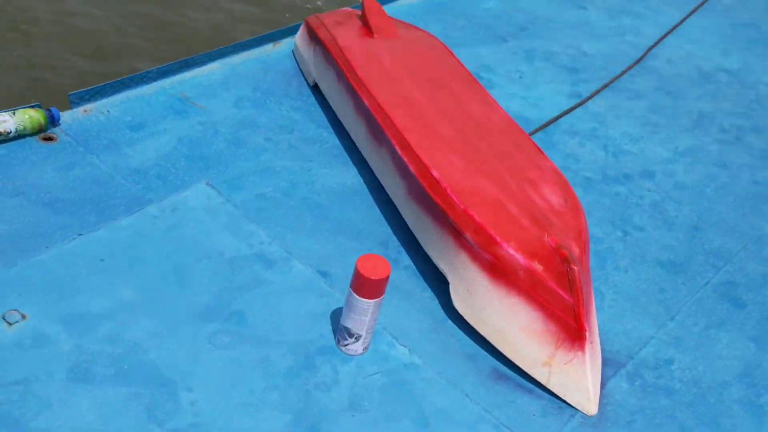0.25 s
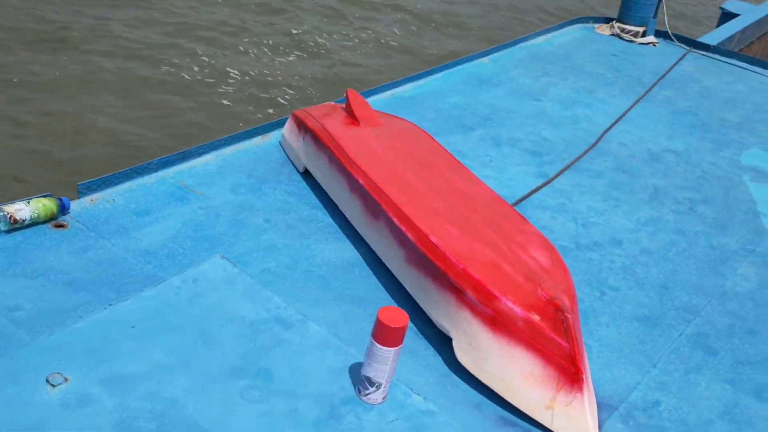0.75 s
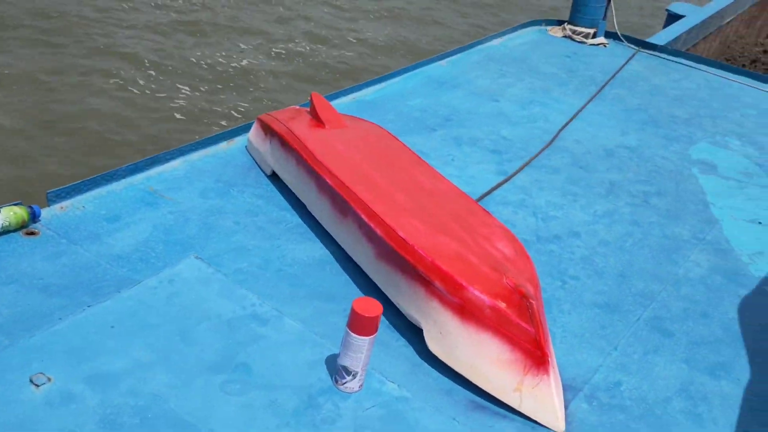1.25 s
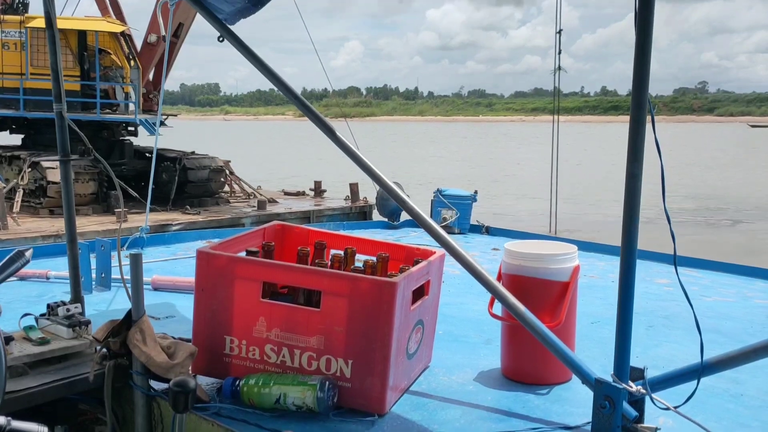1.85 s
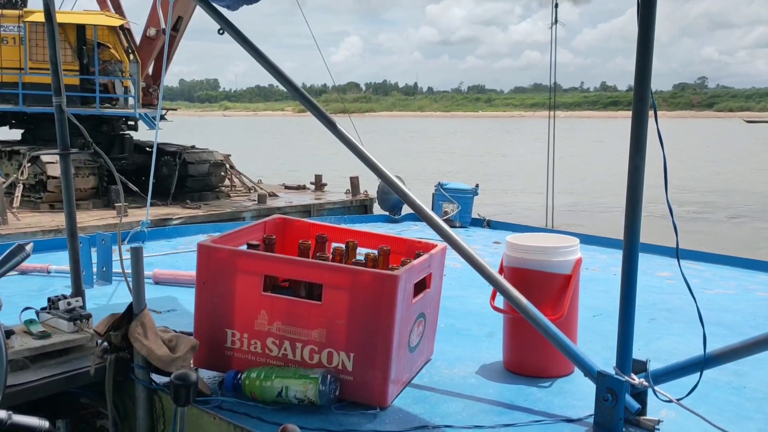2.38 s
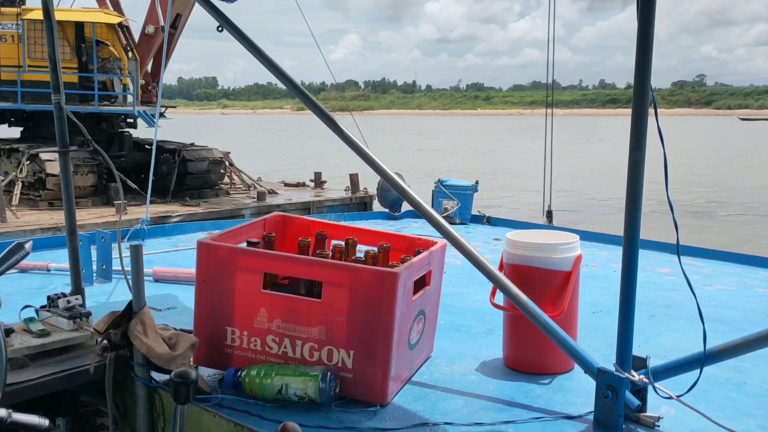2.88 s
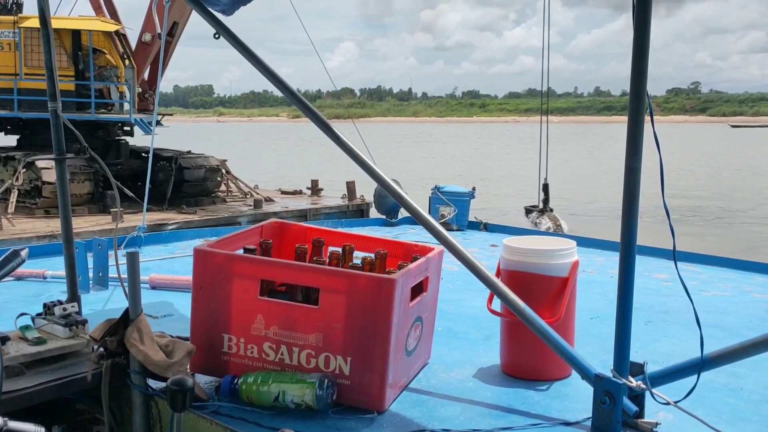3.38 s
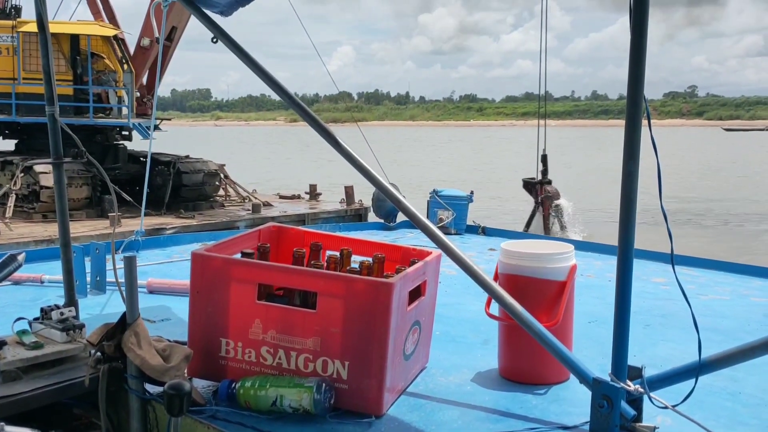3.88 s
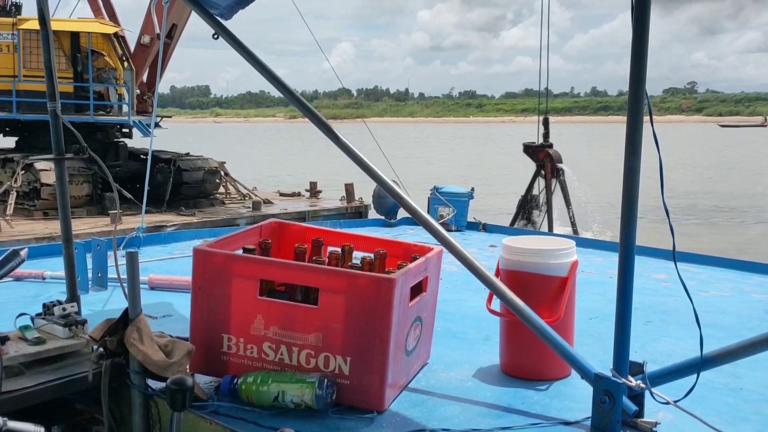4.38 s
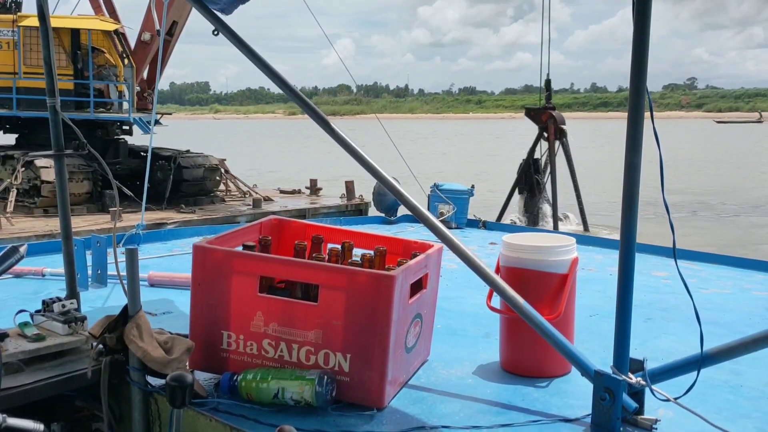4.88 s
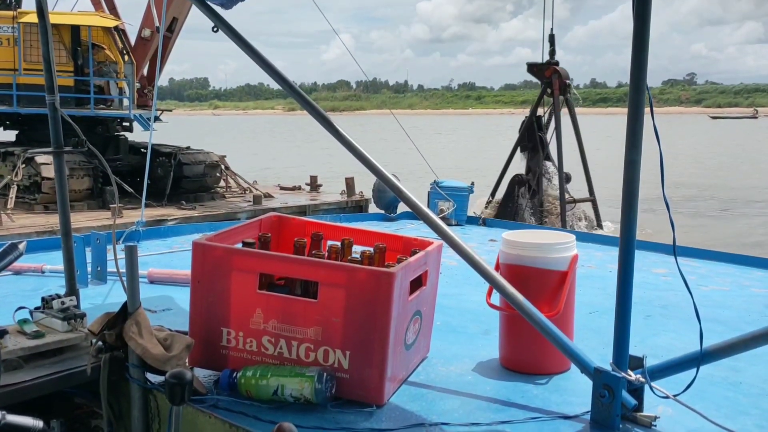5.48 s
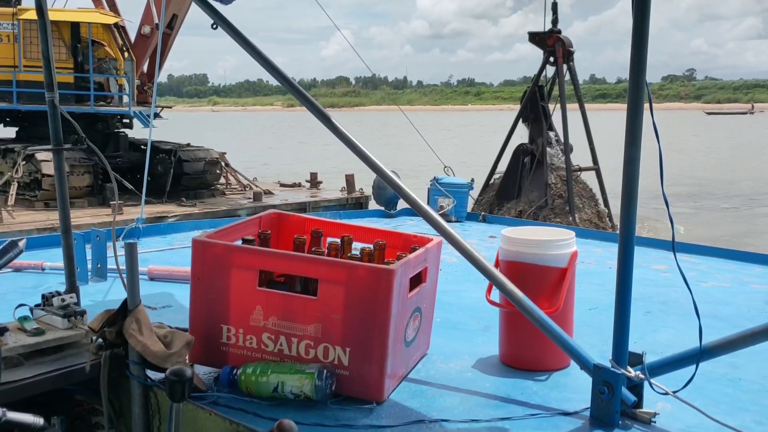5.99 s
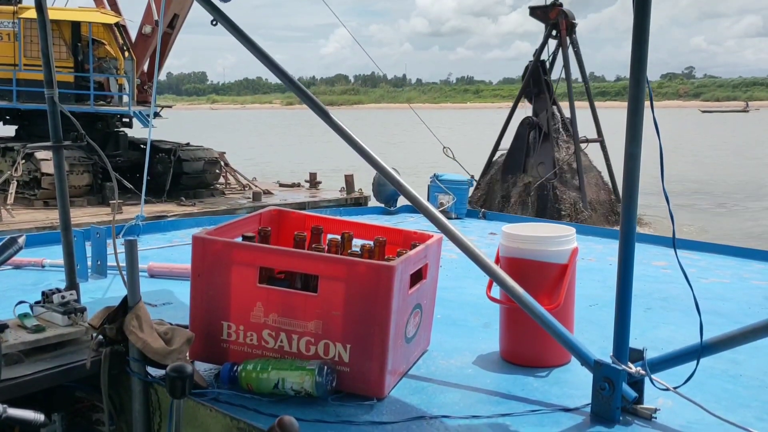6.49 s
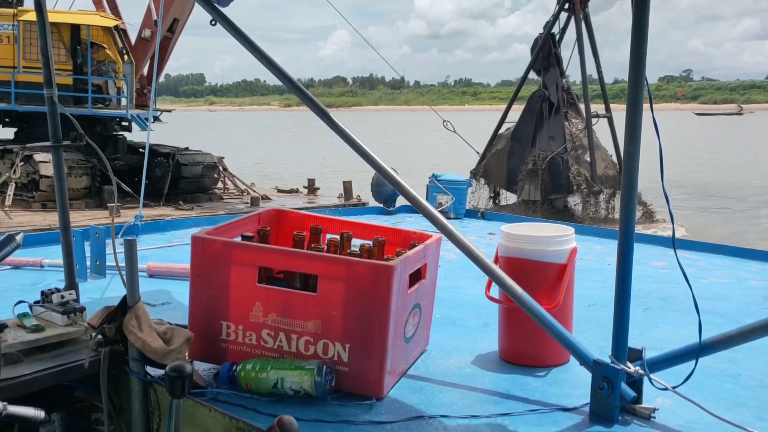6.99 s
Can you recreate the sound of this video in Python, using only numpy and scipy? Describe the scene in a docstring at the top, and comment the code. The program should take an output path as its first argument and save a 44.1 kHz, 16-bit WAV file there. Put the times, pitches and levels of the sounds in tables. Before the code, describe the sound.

From 0 to 1.3 seconds, an open boat deck: low lumpy wind on the microphone, water washing along the hull and dying down, and a soft low engine throb. A bright hissing spray peaks near 0.45 seconds and fades quickly. From 1.2 a low rough moan slides upward, then everything is cut. Silence lasts until about 1.5, when a crane hoisting its grab fades in within a tenth of a second, much louder: coarse diesel roar, rushing air and hiss, a winch gear hum with higher whining multiples, and a faint turbocharger whistle. The gear pitch climbs until 2.3 and holds. At 2.8 the rushing treble dips suddenly, recovering darker; loudness drops by 3.4 and keeps easing. Between 5.7 and 6.35 short high rope squeaks chirp from the left. The winch pitch sags after 6.1, the whistle rises slightly, and the drone continues to the end around 7.2, with low wind gusts beneath.

```python
"""A boat deck in the wind, with water washing by, a burst of spray and an idling engine; the sound is cut.
After a short silence a barge crane hoisting its grab fades in: diesel roar, rushing air, winch gear tones,
engine hum, turbocharger whistle and rope squeaks. Wind, water and engine roar are noise shaped in pitch,
loudness and left-right place; the engine orders, gear, turbocharger and rope are sines, most made rough."""
import sys
import numpy as np
from scipy import signal
from scipy.io import wavfile
from scipy.ndimage import uniform_filter1d

SR = 44100
rng = np.random.default_rng(int(sys.argv[2]) if len(sys.argv) > 2 else 0)


def attenuation_scalar(level_db):
    """Turn a level in dB into a linear amplitude multiplier (20 dB per decade)."""
    decades = np.asarray(level_db, float) / 20
    return 10 ** decades


def int16_out(signal):
    """Quantize to a 16-bit WAV file."""
    q = np.round(np.clip(np.atleast_2d(signal).T, -1, 1) * 32767)
    wavfile.write(sys.argv[1], SR, q.astype(np.int16))


N = 319725
T = np.arange(N) / SR  # time in seconds

# Spectra, of which only the shape counts. Each row: frequency in Hz, relative power per Hz in dB.
WIND_SPECTRUM = [(12, -35), (25, -14), (42, -2), (70, 0), (110, -4), (200, -7), (320, -10), (520, -35),
                 (880, -90)]
WASH_SPECTRUM = [(120, -31), (200, -15), (325, -19), (403, -10.5), (739, -9.5), (823, -11.5), (1020, -11.5),
                 (1370, -18), (1590, -18.5), (5000, -35.5), (6500, -66), (11000, -120)]
SPRAY_SPECTRUM = [(1180, -42), (2000, -12), (2280, -20), (2800, -10.5), (3590, -7.5), (4080, -6.5),
                  (5860, -9.5), (12100, -18), (14900, -12.5), (15600, -43)]
# Spectra of the crane's engine, in the same form. Each row: frequency in Hz, relative power per Hz in dB.
ROAR_SPECTRUM = [(59, -41), (100, -17), (149, -22), (193, -15), (278, -9.5), (329, -4.5), (484, -7),
                 (559, -8.5), (627, -17), (714, -26.5), (823, -10), (913, -8), (1110, 0), (1490, -18.5),
                 (2200, -20.5), (2860, -25.5), (4840, -120)]  # also colours the upper gear tones
LOW_RUSH_SPECTRUM = [(1000, -32), (1700, -5), (2150, -6.5), (2470, -0.5), (2630, -7.5), (2880, -2),
                     (3210, -5.5), (3640, -0.5), (3830, -3), (4100, -12), (4300, -10.5), (5590, -9),
                     (9460, -120)]
HISS_SPECTRUM = [(6000, -17), (7600, -2.5), (8800, -7), (10200, -5.5), (11100, -5.5), (12400, -12.5),
                 (13200, 2), (15700, -6)]
INTAKE_SPECTRUM = [(12500, -35), (13000, -21), (13700, 8), (14800, -2), (15300, -14), (15700, -30)]
# Two spectra of the high rush, before and after it drops and darkens.
# Each row: frequency in Hz, relative power per Hz in dB.
HIGH_RUSH_SPECTRA = [(2470, -43), (4200, -20), (4410, -11), (4960, 2), (5590, -4), (6500, -4.5),
                     (7090, 5.5), (7460, -5), (8000, -20), (10400, -41), (17600, -120)], [(2470, -40),
                     (4200, -13), (4820, 1.5), (5500, -9), (6230, -2.5), (6480, -9), (6650, 1.5),
                     (6940, 4.5), (7900, -28.5), (10300, -40), (17400, -120)]

# How sound reaches the two microphone ports, on deck and by the crane. Each row: frequency in Hz,
# likeness of the ports from 0 to 1, left minus right level in dB, lead of the left port in radians.
DECK_EARS = [(50, .995, 0, 0), (300, .88, -.8, -.5), (520, .5, -3, -.8), (700, .82, -4.3, -1.4),
             (1000, .42, -4, -3.5), (1600, .35, -4, -4.6), (2500, .15, -2, -5), (4000, .4, -2.5, -6.5),
             (5500, .4, -6, -9.5), (7000, .45, -.5, -12.6), (10000, .3, 0, -12.6), (13000, .95, 0, -12.6)]
CRANE_EARS = [(50, .995, .1, 0), (100, .97, .1, .03), (200, .8, .8, .17), (300, .93, 1.5, .24),
              (560, .92, 1, .3), (700, .2, 1, 1.5), (830, .6, 6, .7), (950, .6, 4, .9),
              (1150, .9, 5.5, 1.67), (1450, .43, .5, 2.1), (1620, .55, 2.8, 2.4), (1850, .55, .2, -.2),
              (2500, .85, 4.2, .2), (3000, .77, 3.8, .16), (3300, .6, 1.5, -.9), (3700, .85, 5.5, -.4),
              (4200, .45, 7.3, -.7), (4800, .92, 6.3, 0), (7600, .9, 6.3, 0), (8400, .55, 1.3, 1),
              (9200, .4, 1.2, 5), (11000, .62, 1, 6.2), (12600, .3, .3, 7.5), (14500, .8, .2, 6.4)]

# Fade-in of everything by the crane. Each row: time in seconds, gain in dB.
FADE = [(1.48, -79), (1.521, -34), (1.56, -14.5), (1.587, -3.5), (1.6, 2)]
# Loudness of the crane at the microphone before the fade. Each row: time in seconds, level in dB.
CRANE_LEVEL = [(1.6, -25), (1.71, -21.5), (2.59, -22.5), (3.41, -27), (3.52, -26), (4.83, -28.5),
               (5.23, -27.5), (7.2, -30.5), (7.25, -30.5)]
# Wind gusts. Each row: middle in seconds, half length in seconds, level in dB.
GUSTS = [(.14, 0.061, -41), (.37, 0.018, -31.5), (.45, 0.074, -32), (.93, 0.029, -50), (1.27, 0.048, -39),
         (1.74, 0.076, -34), (2.2, 0.34, -32), (2.66, 0.15, -29), (3.3, 0.12, -34), (3.74, 0.044, -36),
         (3.98, 0.11, -35.5), (4.42, 0.11, -44), (5.02, 0.05, -51), (5.66, 0.12, -40), (5.93, 0.11, -38),
         (6.35, 0.062, -34), (6.74, .14, -36.5), (7.17, 0.037, -45)]
# Multiples of the idling engine's pitch. Each row: multiple, relative level in dB.
IDLE_ORDERS = [(.5, -13), (1, 0), (1.5, -5), (4, -14)]
# Swells of the engine hum. Each row: middle in seconds, half length in seconds, relative level in dB.
HUM_SWELLS = [(2.24, 0.15, -27), (2.98, .16, -36.5), (3.62, 0.42, -35), (4.75, 0.35, -40.5),
              (5.5, .27, -32.5)]
# Weak engine orders. Each row: frequency in Hz, relative level in dB.
DRONES = [(72.3, -50), (86.6, -46), (217, -52)]
# Turbocharger whistle. Each row: time in seconds, pitch in Hz, relative level in dB.
TURBO_PATH = [(1.6, 7040, -24), (1.8, 7230, -25.5), (2.02, 7460, -26.5), (2.2, 7400, -26.5),
              (2.68, 7050, -25), (3.2, 6930, -29.5), (4.05, 6803, -31), (4.45, 6790, -31.5),
              (4.85, 6910, -30), (5.36, 6868, -31.5), (6.1, 6990, -26.5), (6.5, 7270, -27),
              (6.8, 7350, -28.5), (7.25, 7430, -30.5)]
# Rope squeaks on the sheave. Each row: start in seconds, length in seconds, first pitch in Hz,
# last pitch in Hz, peak level in dB before roughness and the lean to the left.
SQUEAKS = [(5.69, .055, 4620, 4660, -33), (5.695, .045, 5310, 5300, -39), (5.73, .05, 5280, 5250, -31),
           (5.782, .065, 4810, 4880, -28), (5.905, .065, 5130, 5080, -34), (5.977, .058, 4630, 4590, -28),
           (5.98, .065, 5300, 5310, -36), (6.035, .07, 5300, 5330, -28), (6.1, .04, 5330, 5320, -39),
           (6.1, .12, 5050, 5140, -37), (6.195, .07, 5170, 5230, -33), (6.24, .1, 5230, 5330, -29)]
# Pitch of the winch gear mesh. Each row: time in seconds, frequency in Hz.
WINCH_PITCH = [(1.6, 262.1), (1.85, 269.5), (2.27, 279.5), (5.17, 279.4), (6.12, 277), (6.64, 263),
               (6.81, 258.6), (7.2, 259)]
# Upper gear tones. Each row: multiple of the mesh pitch, relative level in dB before the housing
# colours it, left minus right level in dB, lead of the left port in radians.
MESH_UPPER = [(3, -5, 9, .7), (4, -3.5, 6, 1.6), (5, 5, 1, 2.1), (6, 4, 3, 2.3)]
# Sudden dips of the treble that come back. Each row: start in seconds, high rush change in dB,
# hiss change in dB, recovery time in seconds.
DIPS = [(2.33, -0.5, -7, 0.33), (2.799, -16, -12, 0.2)]

CUT_S = 1.316  # the deck ends here
EDGE_HZ = 15430  # upper limit of the whole mix
DECK_BREEZE_DB, CRANE_BREEZE_DB = -38, -45.5  # steady wind at each place
WASH_DB, WASH_DB_PER_S = -38, -6.5  # the water dies down
GUST_WASH = .45  # share of the wind's rise in dB that also lifts the wash
SPRAY_S, SPRAY_RISE_S, SPRAY_DB, SPRAY_DB_PER_S = 0.463, 0.11, -37, -31  # peak time, 20 dB rise, peak, decay
DRIZZLE_DB = -49  # thin drizzle ahead of the burst
IDLE_HZ, IDLE_DB, IDLE_WAVER_DB = 52.1, -38, 2.5
MOAN_S, MOAN_HZ, MOAN_OCTAVES_PER_S, MOAN_RISE_S, MOAN_DB = 1.19, 95.7, 19, 0.047, -31.5
HUM_HZ = 144.6
# layers of the crane against its loudness, in dB
ROAR_DB, LOW_RUSH_DB, HIGH_RUSH_DB, HISS_DB, INTAKE_DB, MESH_DB = -4, -3.5, -4, -11.5, -22.5, -7
HISS_SHARE, ROAR_SHARE = 0.62, 1.06  # the hiss follows part of the fall in loudness, the roar a little more
DIP_LOW = .25  # share of a high rush dip that reaches the low rush
OCTAVE_DB, OCTAVE_WAVER_DB = -8.5, 3.0  # gear octave against the mesh
HOUSING_HZ, HOUSING_WIDE_HZ, HOUSING_DB = 528.6, 16.4, 9.5  # resonance that swells the octave


def curves(rows, t=T):
    """Reads every column of a table over time, with straight lines between rows."""
    s, *columns = np.transpose(rows)
    return [np.interp(t, s, c) for c in columns]


def read(points, hz):
    """Reads every column of a table at the given frequencies, on a log axis."""
    return curves([(np.log(f + 1), *rest) for f, *rest in points], np.log(hz + 1))


def smooth(width):
    """Slow complex random signal of rms 1, with the given bandwidth in Hz."""
    r = np.exp(-np.pi * width / SR)
    chance = rng.standard_normal(N) + 1j * rng.standard_normal(N)
    return np.sqrt((1 - r * r) / 2) * signal.lfilter([1], [1, -r], chance)


def waver(rate_hz):
    """Slow real random curve of rms about 1, drawn 200 times a second."""
    r = np.exp(-np.pi * rate_hz / 200)
    slow = signal.lfilter([1], [1, -r], rng.standard_normal(N * 200 // SR + 2))
    slow = uniform_filter1d(slow, size=3)
    return np.interp(T * 200, np.arange(len(slow)), slow) * np.sqrt(1 - r * r)


def swells(rows):
    """Adds up bell-shaped swells as power over time."""
    return sum(attenuation_scalar(2 * db) * np.exp(-((T - s) / half) ** 2) for s, half, db in rows)


def tone(hz, lean_db=0., lead=0., shape=0.79):
    """A sine along a pitch curve, placed between the ports; shape sets its rms, a random shape smears it."""
    turn = shape * np.exp(2j * np.pi * (np.cumsum(hz + 0 * T) / SR + rng.random()))
    left = attenuation_scalar(lean_db / 2)
    right = attenuation_scalar(-lean_db / 2) * np.exp(-1j * lead)
    return np.sqrt(2) * (turn * np.array([[left], [right]])).real


def noise(layers, ears, patchy_db, flicker_db, size=1024, count=N):
    """Random short-time spectra in drifting patches at two ports; layers are (spectrum, dB over time)."""
    hop = size // 4
    frames, hz = count // hop + 5, np.fft.rfftfreq(size, 1 / SR)
    a, b, c, d, patches = rng.standard_normal((5, frames, len(hz))).transpose(0, 2, 1)
    shared, separate = a + 1j * b, c + 1j * d
    patches = uniform_filter1d(uniform_filter1d(patches, size=12, axis=0), size=10, axis=1)
    flicker = uniform_filter1d(rng.standard_normal(frames), size=4)

    same, lean_db, lead = (column[:, None] for column in read(ears, hz))
    same = np.clip(same, 0, 1)
    left = shared * attenuation_scalar(lean_db / 2)
    right = same * shared + np.sqrt(1 - same ** 2) * separate
    right = right * np.exp(-1j * lead) / attenuation_scalar(lean_db / 2)
    # power of the mean of both ports, so that layer levels hold for that mean
    middle = (attenuation_scalar(lean_db) + attenuation_scalar(-lean_db) + 2 * same * np.cos(lead)) / 4

    power = 0
    for spectrum, db in layers:
        colour = attenuation_scalar(2 * read(spectrum, hz)[0])
        frame_db = np.interp(np.arange(frames) * hop / SR, T, db)
        power = power + np.outer(colour / colour.sum(), attenuation_scalar(2 * frame_db))
    field = attenuation_scalar(patchy_db * patches / patches.std() + flicker_db * flicker / flicker.std())
    # 1.5 makes up for power lost where random frames overlap
    z = np.array([left, right]) * np.sqrt(1.5 * power / middle) * field
    out = signal.istft(z, nperseg=size, noverlap=size - hop)[1][:, :count]
    return np.pad(out, [(0, 0), (0, N - count)])


def wind_level():
    """A steady breeze with gusts added as power, in dB."""
    breeze_db = np.where(T < CUT_S, DECK_BREEZE_DB, CRANE_BREEZE_DB)
    return 10 * np.log10(attenuation_scalar(2 * breeze_db) + swells(GUSTS))


def spray_level():
    """Thin drizzle, then one burst that rises fast and dies away, in dB."""
    after = T - SPRAY_S
    burst_db = SPRAY_DB + np.where(after < 0, 20 * after / SPRAY_RISE_S, SPRAY_DB_PER_S * after)
    return np.maximum(burst_db, np.where(after < 0, DRIZZLE_DB, -60))


def deck_wind_and_water():
    """Lumpy low noise of the wind, and water along the hull that gets louder with the gusts."""
    wind_db = wind_level()
    wash_db = WASH_DB + WASH_DB_PER_S * T + GUST_WASH * (wind_db - DECK_BREEZE_DB)
    wind = noise([(WIND_SPECTRUM, wind_db)], DECK_EARS, 1.0, 1.6, size=2048, count=2 * SR)
    layers = [(WASH_SPECTRUM, wash_db), (SPRAY_SPECTRUM, spray_level())]
    return wind + noise(layers, DECK_EARS, 1.3, 0.93, count=2 * SR)


def deck_idle():
    """The engine throbs below: a few multiples of one low pitch that waver together in level."""
    level = attenuation_scalar(IDLE_DB + IDLE_WAVER_DB * waver(4.3))
    return level * sum(attenuation_scalar(db) * tone(k * IDLE_HZ) for k, db in IDLE_ORDERS)


def deck_moan():
    """A low, rough moan with a weak octave slides upward just before the cut."""
    hz = MOAN_HZ * 2 ** (MOAN_OCTAVES_PER_S * np.clip(T - MOAN_S, 0, .2))
    level = attenuation_scalar(MOAN_DB) * np.clip((T - MOAN_S) / MOAN_RISE_S, 0, 1) ** 2
    low = tone(hz, shape=.8 + .55 * smooth(40))
    octave = .2 * tone(2 * hz, shape=smooth(80))
    return level * (low + octave)


def crane_wind():
    """Wind on the ports by the crane: low noise, almost the same in both."""
    return noise([(WIND_SPECTRUM, wind_level())], CRANE_EARS, 1.7, 1.0, size=2048)


def rope():
    """Stick and slip on the sheave gives short, slightly rough sliding whistles."""
    out, grain = np.zeros(N), 1.05 + .45 * smooth(70)
    for s, length, from_hz, to_hz, db in SQUEAKS:
        u = np.arange(0, 1, 1 / (length * SR))  # progress from 0 to 1
        at = round(s * SR) + np.arange(len(u))
        hz = from_hz + (to_hz - from_hz) * u
        turn = np.exp(2j * np.pi * (np.cumsum(hz) / SR + rng.random()))
        out[at] += attenuation_scalar(db) * np.sqrt(2) * np.sin(np.pi * u) * (grain[at] * turn).real
    return out * attenuation_scalar(np.array([[3.25], [-3.25]]))  # from the left


def turbo():
    """Blade tone smeared by turbulent air, a wider skirt around it, and its octave."""
    hz, db = curves(TURBO_PATH)
    core = tone(hz, 6.4, shape=attenuation_scalar(-0.5) * smooth(23.6) + attenuation_scalar(-16) * smooth(150))
    octave = tone(2 * hz, shape=attenuation_scalar(-13) * smooth(100) + attenuation_scalar(-15.5) * smooth(390))
    return attenuation_scalar(db) * (core + octave)


def hum():
    """Low engine orders as sines: one swells and fades, the others waver weakly."""
    weak = sum(attenuation_scalar(db) * tone(hz, shape=.7 + .5 * smooth(3)) for hz, db in DRONES)
    return np.sqrt(swells(HUM_SWELLS)) * tone(HUM_HZ) + weak


def winch():
    """Gear teeth meet at a rate that climbs, holds and then drops; upper multiples waver through the housing."""
    hz = curves(WINCH_PITCH)[0]
    db = curves(CRANE_LEVEL)[0] + MESH_DB
    housing_db = HOUSING_DB * np.exp(-((2 * hz - HOUSING_HZ) / HOUSING_WIDE_HZ) ** 2)
    octave_db = db + OCTAVE_DB + housing_db + OCTAVE_WAVER_DB * waver(3.2)
    out = attenuation_scalar(db + 0.52 * waver(4.4)) * tone(hz, 0.74, 0.33, 1 + 0.23 * smooth(24))
    out += attenuation_scalar(octave_db) * tone(2 * hz, 1.1, 0.43, 1 + 0.25 * smooth(6.4))
    for k, rel_db, lean_db, lead in MESH_UPPER:
        upper_hz = round(k) * hz
        upper_db = db + rel_db + read(ROAR_SPECTRUM, upper_hz)[0]
        out += attenuation_scalar(upper_db) * tone(upper_hz, lean_db, lead, .85 + .7 * smooth(12))
    rattle = tone(4 * hz, 2.3, 1.97, smooth(114))  # loose teeth smear the fourth multiple widely
    return out + attenuation_scalar(db - 5.0) * rattle


def engine():
    """Broad roar in the housing, rushing air, intake and hiss, all noise tied to the crane's loudness."""
    db, start_db = curves(CRANE_LEVEL)[0], CRANE_LEVEL[0][1]
    fall_db = db - start_db
    roar_db = start_db + ROAR_SHARE * fall_db + ROAR_DB
    hiss_db = start_db + HISS_SHARE * fall_db + HISS_DB + 1.35 * waver(19)
    low_db, high_db = db + LOW_RUSH_DB, db + HIGH_RUSH_DB
    for s, rush_dip_db, hiss_dip_db, recovery in DIPS:
        dip = (T > s) * np.exp(-(np.maximum(T - s, 0) / recovery) ** 2)
        high_db = high_db + rush_dip_db * dip
        hiss_db = hiss_db + hiss_dip_db * dip
        low_db = low_db + DIP_LOW * rush_dip_db * dip
    late = T > DIPS[-1][0]  # the high rush stays darker from the last dip on
    before, after = HIGH_RUSH_SPECTRA
    layers = [
        (ROAR_SPECTRUM, roar_db),
        (LOW_RUSH_SPECTRUM, low_db),
        (HISS_SPECTRUM, hiss_db),
        (INTAKE_SPECTRUM, db + INTAKE_DB),
        (before, np.where(late, -np.inf, high_db)),
        (after, np.where(late, high_db, -np.inf)),
    ]
    return noise(layers, CRANE_EARS, 0.79, 0.48)


def scene():
    """The deck is cut off; after a short silence the crane fades in."""
    deck = deck_wind_and_water() + deck_idle() + deck_moan()
    crane = crane_wind() + rope() + turbo() + hum() + winch() + engine()
    cut = np.clip((CUT_S - T) / 0.0017, 0, 1)
    fade = attenuation_scalar(curves(FADE)[0]) * (T > FADE[0][0])
    return deck * cut + crane * fade


def low_pass(x):
    """Removes everything above the highest recorded frequency."""
    return signal.sosfilt(signal.butter(12, 16180, fs=SR, output="sos"), x)


def record(dry):
    """A steep low-pass filter takes away the highest treble."""
    lowpass = signal.firwin(511, EDGE_HZ, window=("kaiser", 9), fs=SR)
    limited = signal.oaconvolve(dry, lowpass[None], "same")
    return low_pass(limited)


dry = scene()
out = record(dry)
int16_out(out)
```